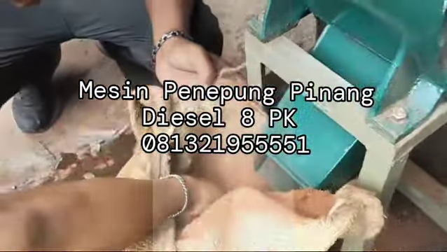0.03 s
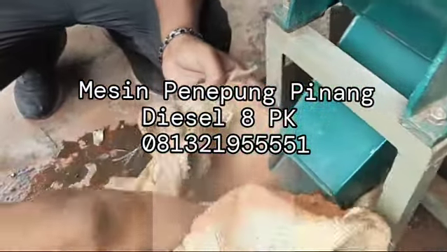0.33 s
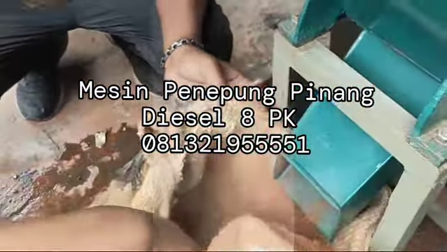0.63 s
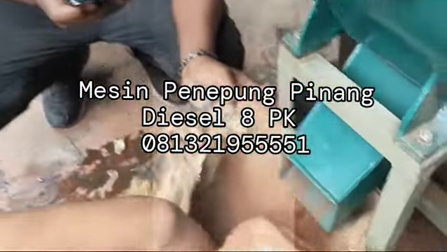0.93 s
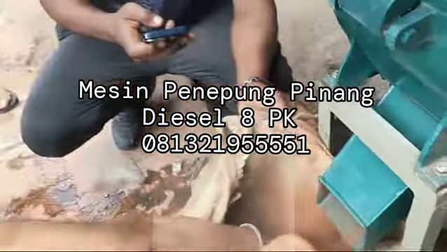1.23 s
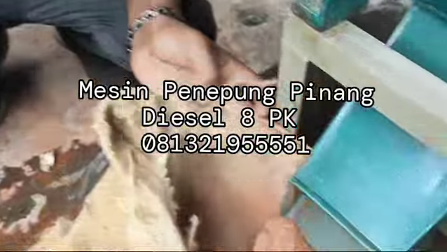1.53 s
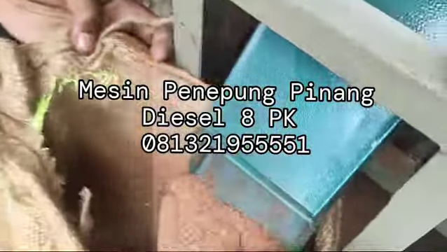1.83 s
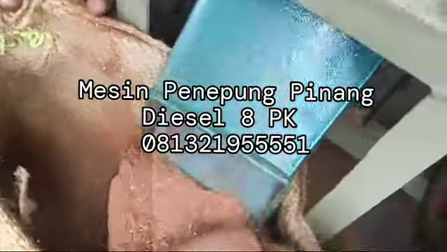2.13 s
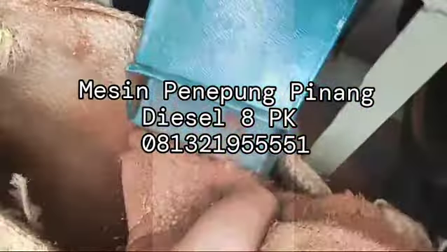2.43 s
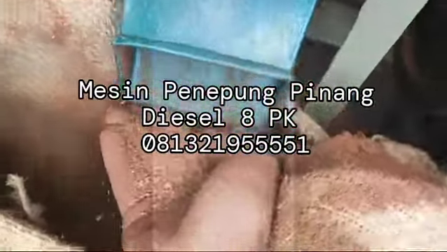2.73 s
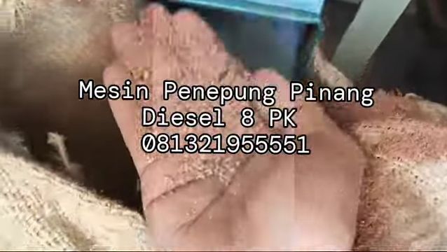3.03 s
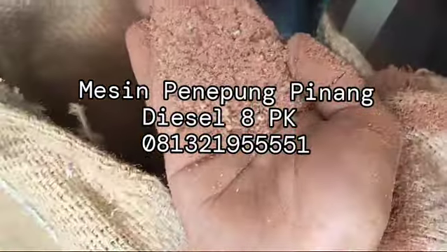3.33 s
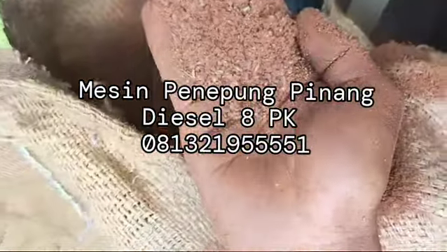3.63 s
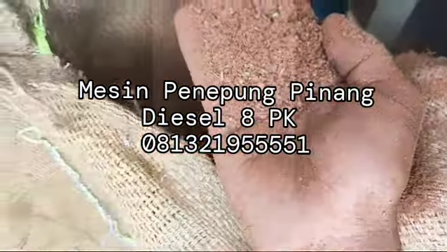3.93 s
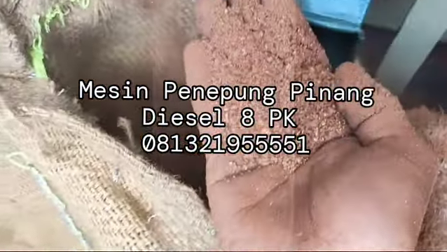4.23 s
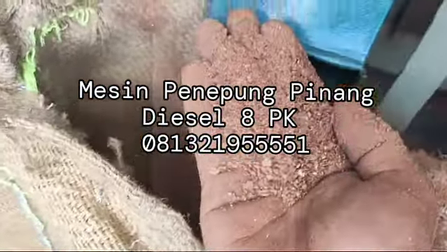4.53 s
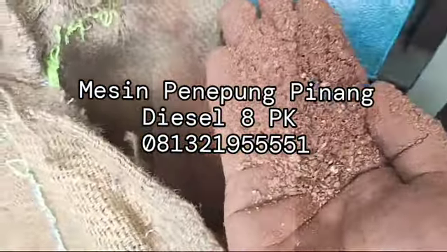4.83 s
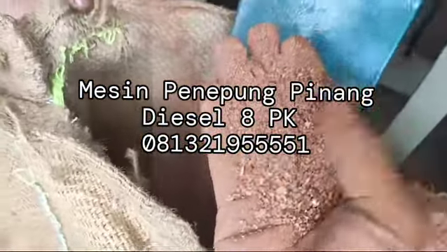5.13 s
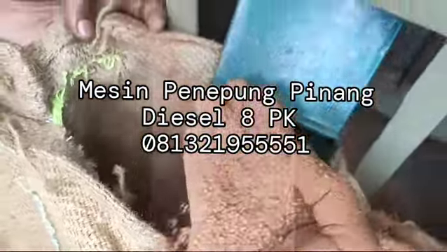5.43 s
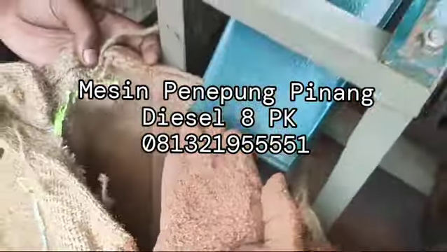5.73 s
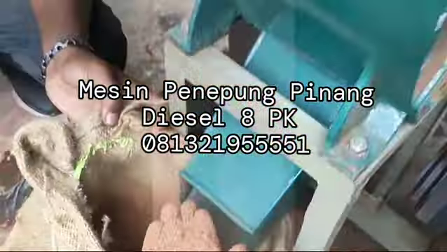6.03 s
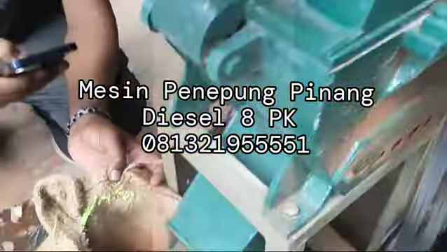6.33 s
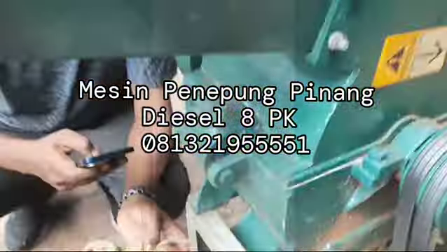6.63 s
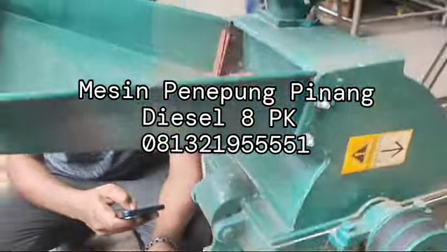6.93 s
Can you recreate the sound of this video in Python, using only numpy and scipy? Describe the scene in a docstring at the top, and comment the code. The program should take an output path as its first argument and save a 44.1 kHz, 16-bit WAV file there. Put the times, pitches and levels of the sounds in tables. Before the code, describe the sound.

A loud diesel milling machine thuds rapidly up close under a steady grinding roar and a breathy high whistle.

```python
"""A single-cylinder diesel driving a hammer mill, outdoors, miked close over the sack at the outlet chute.
The engine thuds about twenty times a second under the roar of grit whirling against the steel casing.
The casing rings and dusty air whistles from the chute. The bass swells as the microphone dips into
the sack; near the end it swings away towards the drive, and the engine comes up on the right."""
import sys
import numpy as np
from scipy import signal
from scipy.fft import rfft, irfft
from scipy.io import wavfile

SR = 44100
rng = np.random.default_rng(int(sys.argv[2]) if len(sys.argv) > 2 else 0)


def dump_mix(stems):
    """Bounce the given channels to the path in sys.argv[1] as a 16-bit WAV at rate SR."""
    frames = np.atleast_2d(stems).T  # one column per channel
    limited = np.clip(frames, -1, 1)  # hard clip at full scale
    pcm = np.round(limited * 32767).astype(np.int16)
    wavfile.write(sys.argv[1], SR, pcm)


N = 308259
TIME = np.arange(N) / SR

# the engine picks up a little, then sags under load: time_s, firing_rate_hz
ENGINE_SPEED = [(0.6, 19.383), (3.3, 19.56), (6.2, 19.382)]
# how squarely the microphone faces the chute's mouth, heard as the mill's level: time_s, level_db
MIC_FACING = [(0.1, -25), (0.4, -25), (0.95, -27.5), (1.14, -28), (1.19, -24.5), (1.5, -23.5), (5.19, -24),
              (5.34, -25), (5.99, -24.5), (6.65, -28), (6.9, -27)]
# the microphone lifts, dips into the sack, stays and leaves, heard as the boom's level: time_s, level_db
MIC_DIP = [(0.6, -2), (1.1, -3), (1.5, .3), (2.3, 2), (2.85, 4), (3.6, 4), (4.6, 2.5), (5.4, 1), (6.2, -4),
           (6.9, -5)]
# one cycle, from valve thump and combustion knock through exhaust boom, bark and pipe ring to intake gulp:
# delay_ms, pitch_hz, t60_s, level_db, sack_share (0-1, the part that comes through the sack)
ENGINE_CYCLE = [ (2.94, 315, 0.015, -21.5, 0.8), (3.0, 252, 0.26, -41.5, 0.1),
                (7.34, 796, 0.042, -25, 0.76), (7.66, 956, 0.024, -23.5, 0),
                (14.34, 114.4, 0.12, -14.5, 1.0), (16.1, 345, 0.009, -9.5, 0.35),
                (16.64, 427, 0.32, -30, 0.73), (31.42, 396, 0.02, -14, 0.4), (47.4, 362, 0.014, -7.5, 0.25),
                ]
# the engine is screened while the microphone lifts: centre_s, half_length_s, change_db
ENGINE_SCREENING = [(1.05, 0.17, -2.5)]
# hum of the engine covers: firing_multiple, level_db, dip_db_per_db, turn_left_db, turn_right_db
COVER_TONES = [(15, -34, -.65, .7, 11), (19, -43.5, 1.5, 6, 25), (20, -35, 0.5, 1, 17)]
# gas slaps out of the engine three times a cycle: delay_ms, level_db
GAS_SLAPS = [(16.2, -15), (31.4, -19), (47.2, -16.5)]
# spectrum of the milling chamber: frequency_hz, left_density_db, right_density_db
ROAR_SPECTRUM = [(20, -55, -57), (60, -51.5, -53.5), (200, -54.5, -52), (456, -57.5, -53), (630, -60, -54),
                 (885, -57.5, -53.5), (2040, -56, -56), (2840, -51.5, -53.5), (4240, -52.5, -55),
                 (5400, -50.5, -55), (7080, -52, -48.5), (8030, -54, -53), (8630, -57.5, -55.5),
                 (11800, -60, -57.5), (12100, -62, -61), (15500, -66, -64.5)]
# how the roar follows the microphone, bass with the dip, then body, hiss and top with the facing:
# left_db_per_db, right_db_per_db, turn_left_db, turn_right_db
ROAR_BEAM = [ (0.2, -0.25, -6.5, -0.3), (1.1, 0.9, 0, -3.2), (-0.15, 0.16, -2.5, -2),
             (0.9, 0.62, -2.6, 0.3), ]
# modes of the steel casing and chute, two further steady tones near 2 kHz and 8.4 kHz, plus a hissy ring near 7
# kHz at the right microphone port: # pitch_hz, width_hz, left_db, right_db
STEADY_RINGS = [(941, 94, -33, -37), (1296, 190, -29, -42), (1630, 160, -34.5, -37.5), (1958, 36, -33, -52),
                (3538, 90, -31, -50), (5580, 290, -39, -41), (6860, 450, -28.5, -27.5),
                (7160, 230, -29.5, -23.5), (7630, 110, -50, -29), (8415, 120, -30, -29)]
# the microphone passes through the chute's jet: centre_s, half_length_s, rise_db
JET_CROSSINGS = [(1.42, 0.27, 10.5), (4.25, .15, 5), (5.33, .2, 9.5)]
# the chute's whistle comes and goes with the flow: time_s, pitch_hz, level_db
CHUTE_WHISTLE = [(0.05, 5070, -24), (0.95, 5090, -22), (1.12, 5090, -28), (1.3, 5160, -21.5),
                 (1.65, 5150, -17), (1.98, 5120, -25), (2.3, 5140, -21.5), (2.52, 5140, -24),
                 (2.87, 5130, -19), (3.2, 5130, -25), (3.65, 5120, -29), (3.95, 5135, -23.5),
                 (4.4, 5130, -24), (4.8, 5130, -24), (5.2, 5125, -22), (5.58, 5115, -21),
                 (6.05, 5105, -23.5), (6.35, 5100, -36)]
# air buffets the microphone ports: centre_s, half_length_s, rise_db
DRAUGHT_GUSTS = [(1.5, .25, 7), (2.07, .1, 8), (4.4, 0.28, 5), (5.02, 0.15, 14.5), (5.65, .12, 9)]
# brief resonances as the microphone moves, plus a broad, faint swell of hiss on the right at 2.5 s:
# centre_s, half_length_s, pitch_hz, width_hz, left_db, right_db
PASSING_BANDS = [ (0.45, 0.13, 3450, 120, -26, -45), (0.5, .28, 8480, 130, -27, -40),
                 (0.8, .15, 6780, 120, -40, -19), (1.12, .1, 3800, 90, -25, -45),
                 (1.15, .08, 9650, 150, -42, -25), (1.218, .042, 4500, 55, -18.5, -33),
                 (1.34, .13, 6300, 200, -20, -33), (1.9, .3, 7800, 500, -25, -33),
                 (2.5, .4, 3800, 2500, -45, -26), (2.52, 0.12, 7260, 80, -29, -21),
                 (2.5, .3, 7350, 300, -24, -36), (3.3, .2, 6800, 300, -28, -29),
                 (3.33, 0.092, 3500, 90, -29, -42), (3.35, .3, 9800, 300, -34, -45),
                 (3.7, .25, 8500, 150, -40, -30), (3.75, 0.29, 1320, 200, -27, -31),
                 (4.5, 0.43, 7180, 70, -31, -23), (5.0, 0.43, 1550, 300, -28, -42),
                 (5.2, .13, 7700, 150, -27, -36), (5.3, 0.11, 6240, 120, -24, -37),
                 (5.523, 0.023, 4470, 50, -22.5, -32), (5.695, .02, 4500, 50, -17, -32),
                 (5.8, .17, 8520, 130, -27, -36), (6.1, .1, 3780, 90, -27, -45),
                 (6.15, 0.12, 9660, 110, -45, -24), (6.45, .17, 6740, 90, -28, -25),
                 (6.85, 0.23, 6800, 400, -38, -19.5), ]
# the sack's mouth rings as the microphone enters: centre_s, half_length_s, pitch_hz, width_hz, level_db
SACK_NOTE = (2.15, 0.6, 175, 43, -25)


def from_db(db):
    """Decibels to gain."""
    return 10 ** (np.asarray(db) / 20)


def stereo(left_db, right_db, amount=1):
    """Left and right gains; amount scales both decibel values."""
    return from_db(amount * np.array([[left_db], [right_db]]))


def unit_rms(x):
    """Scale each channel to rms 1."""
    return x / np.sqrt(np.mean(x ** 2, axis=-1, keepdims=True) + 1e-20)


def curves(rows):
    """One curve per column after the time, joined by straight lines."""
    times_s, *columns = np.transpose(rows)
    return [np.interp(TIME, times_s, column) for column in columns]


def about_mean(rows):
    """A level curve in dB about its mean."""
    level_db, = curves(rows)
    return level_db - level_db.mean()


def bell(centre_s, half_s):
    """A smooth rise to 1 and fall around a moment."""
    return np.exp(-((TIME - centre_s) / half_s) ** 2 / 2)


def swells(rows):
    """A bell-shaped change in dB for each row."""
    return sum(change_db * bell(centre_s, half_s) for centre_s, half_s, change_db in rows)


def drift(rate_hz):
    """A slow random wander with a spread of about 1."""
    return np.interp(TIME * rate_hz, np.arange(256), rng.standard_normal(256))


def butter(x, hz, kind, order=2):
    """Causal Butterworth filter."""
    return signal.sosfilt(signal.butter(order, hz, kind, fs=SR, output="sos"), x)


def noise_band(low_hz, high_hz, order=2):
    """A band of noise, unrelated left and right; rms 1."""
    return unit_rms(butter(rng.standard_normal((2, N)), [low_hz, high_hz], "bandpass", order))


def resonance(hz, width_hz):
    """Stereo noise through a resonator, a ring when narrow and a hiss when wide; rms 1."""
    radius = np.exp(-np.pi * width_hz / SR)
    poles = [1, -2 * radius * np.cos(2 * np.pi * hz / SR), radius ** 2]
    return unit_rms(signal.lfilter([1, 0, -1], poles, rng.standard_normal((2, N))))


def ring(clicks, hz, t60_s):
    """Each click starts a dying sine of its own height."""
    radius, angle = from_db(-60 / (t60_s * SR)), 2 * np.pi * hz / SR
    return signal.lfilter([0, np.sin(angle)], [1, -2 * radius * np.cos(angle), radius ** 2], clicks + 1e-18)


def tails(clicks, decay_s):
    """An envelope that jumps at each click and dies away."""
    return signal.lfilter([1], [1, -np.exp(-1 / (decay_s * SR))], clicks)


def strokes(firings, delay_ms, uneven_db, jitter_ms):
    """One click in every engine cycle, each a little different in time and strength."""
    timing, strength = rng.standard_normal((len(firings), 2)).T
    at = np.round(firings + (delay_ms + jitter_ms * timing) * SR / 1000).astype(int)
    inside = (at >= 0) & (at < N)
    clicks = np.zeros(N)
    clicks[at[inside]] = from_db(uneven_db * strength[inside])
    return clicks


def throb(cycles, depth_db):
    """Airflow swells just after each exhaust blast, or ebbs there if the depth is negative; rms 1."""
    return unit_rms(from_db(depth_db * np.cos(2 * np.pi * (cycles - .44))))


def diesel(firings, sack_db, exposed, open_air_db_per_db=-0.84):
    """Knock, exhaust blast and gulp ring out every cycle, mostly on the left until the microphone turns."""
    open_air_db = open_air_db_per_db * sack_db   # the sack screens the direct sound
    thuds = 0
    for delay_ms, hz, t60_s, level_db, sack_share in ENGINE_CYCLE:
        clicks = strokes(firings, delay_ms, uneven_db=.8, jitter_ms=.03)
        path_db = sack_share * sack_db + (1 - sack_share) * open_air_db
        thuds += ring(clicks, hz, t60_s) * from_db(level_db + path_db)
    thuds = butter(thuds, 71, "highpass") * from_db(swells(ENGINE_SCREENING))
    return thuds * stereo(-1, -20) * stereo(-2, 12.5, exposed)


def cover_drone(cycles, sack_db, exposed, waver_db=3.7):
    """The covers hum in clean tones locked to the engine, louder with the microphone towards them."""
    hum = 0
    for multiple, level_db, dip_db_per_db, turn_left_db, turn_right_db in COVER_TONES:
        tone = np.sqrt(2) * np.sin(2 * np.pi * multiple * cycles)
        gain = from_db(level_db + dip_db_per_db * sack_db + waver_db * drift(rate_hz=4))
        hum += tone * gain * stereo(turn_left_db, turn_right_db, exposed)
    return hum * stereo(0, -17)


def block_clatter(firings, turned, turn_db=8):
    """Each ignition shakes a short rattle out of the block, plain as soon as the microphone turns."""
    clicks = strokes(firings, delay_ms=7.6, uneven_db=0.5, jitter_ms=0.28)
    rattle = unit_rms(noise_band(780, 1130) * tails(clicks, decay_s=0.0053))
    return rattle * from_db(turn_db * np.sqrt(turned)) * stereo(-35, -39)


def exhaust_puffs(firings, sack_db, dip_db_per_db=1.1):
    """A ragged puff of gas follows each blast and booms inside the sack."""
    clicks = strokes(firings, delay_ms=15.5, uneven_db=1.2, jitter_ms=.2)
    gas = butter(noise_band(58, 200), 130, "lowpass", order=1)
    puffs = unit_rms(gas * tails(clicks, decay_s=0.01))
    return puffs * from_db(dip_db_per_db * sack_db) * stereo(-35, -44)


def gas_slaps(firings, turned):
    """Short rough bursts of gas give the bark, its rebound and the gulp their edge."""
    clicks = sum(strokes(firings, delay_ms, uneven_db=1.3, jitter_ms=0.14) * from_db(level_db)
                 for delay_ms, level_db in GAS_SLAPS)
    bursts = noise_band(240, 520) * tails(clicks, decay_s=.0028)
    return bursts * stereo(0, -11) * stereo(0, 8, turned)


def grinding(cycles, facing_db, sack_db, turned, grit_db=2.0, bass_hz=500, hiss_hz=2600, top_hz=8800):
    """Countless uneven grains hit the casing and merge into a roar that beams out of the chute."""
    hz = np.arange(N // 2 + 1) * SR / N + 1
    points_hz, *sides_db = np.transpose(ROAR_SPECTRUM)
    colour = from_db([np.interp(np.log(hz), np.log(points_hz), side_db) for side_db in sides_db])
    grains = unit_rms(rng.standard_normal((2, N)) * from_db(grit_db * rng.standard_normal(N)))
    spectrum = rfft(grains) * colour * np.sqrt(SR / 2)
    low = 1 / (1 + (hz / bass_hz) ** 4)
    high = 1 / (1 + (hiss_hz / hz) ** 4)
    highest = 1 / (1 + (top_hz / hz) ** 12)
    crossovers = (low, 1 - low - high, high - highest, highest)
    bass, body, hiss, top = (irfft(spectrum * part, N) for part in crossovers)
    bass *= throb(cycles, depth_db=np.array([[2.5], [.3]]))
    bands = [(bass, sack_db), (body, facing_db), (hiss, facing_db), (top, facing_db)]
    roar = 0
    for (band, mic_db), (left_slope, right_slope, turn_left_db, turn_right_db) in zip(bands, ROAR_BEAM):
        roar += band * stereo(left_slope, right_slope, mic_db) * stereo(turn_left_db, turn_right_db, turned)
    return roar


def casing_and_port(facing_db, beam_below_hz=2500):
    """Grit keeps the steel panels ringing; steady tones sound near 2 kHz and 8.4 kHz, and the right microphone
    port adds a hissy ring near 7 kHz."""
    rings = 0
    for hz, width_hz, left_db, right_db in STEADY_RINGS:
        # the lower modes beam out of the chute
        beam_db = 1.3 * facing_db - 0.75 if hz < beam_below_hz else 0.18 * facing_db
        rings += resonance(hz, width_hz) * stereo(left_db, right_db) * from_db(beam_db)
    return rings


def chute_jet():
    """A hiss just above the whistle swells as the microphone passes through the chute's jet."""
    return noise_band(5350, 6350, order=3) * from_db(swells(JET_CROSSINGS)) * stereo(-28, -40)


def chute_whistle(cycles, width_hz=137, wander_hz=18, waver_db=0.2):
    """Dusty air leaves the chute with a breathy, wandering whistle that fades as the microphone turns."""
    pitch_hz, level_db = curves(CHUTE_WHISTLE)
    turbulence = rng.standard_normal((2, N)) + 1j * rng.standard_normal((2, N))
    flutter = butter(turbulence, width_hz / 2, "lowpass")
    phase = 2 * np.pi * np.cumsum(pitch_hz + wander_hz * drift(rate_hz=8)) / SR
    tone = unit_rms(np.real(flutter * np.exp(1j * phase)))
    gain = from_db(level_db + waver_db * drift(rate_hz=7.1))
    return tone * throb(cycles, depth_db=2.0) * gain * stereo(0, -14)


def draught(cycles, sack_db, turned, dip_db_per_db=.7, turn_db=-9):
    """Air from the chute buffets the microphone ports in gusts and throbs with the engine."""
    gain = from_db(dip_db_per_db * sack_db + swells(DRAUGHT_GUSTS) + turn_db * turned)
    return noise_band(36, 82) * gain * throb(cycles, depth_db=-2.0) * stereo(-37, -58)


def passing_rings_and_hiss():
    """Rings come and go as the microphone moves; once a broad, faint hiss swells on the right."""
    return sum(resonance(hz, width_hz) * bell(centre_s, half_s) * stereo(left_db, right_db)
               for centre_s, half_s, hz, width_hz, left_db, right_db in PASSING_BANDS)


def sack_mouth(cycles):
    """Close up, the open sack gives a hollow note that pulses with the exhaust."""
    centre_s, half_s, hz, width_hz, level_db = SACK_NOTE
    hollow = unit_rms(butter(resonance(hz, width_hz), [110, 260], "bandpass"))
    gain = bell(centre_s, half_s) * from_db(level_db)
    return hollow * throb(cycles, depth_db=1.5) * gain * stereo(0, -14)


def scene(turn_start_s=6.23, turn_length_s=0.71):
    """Engine and mill run together while the microphone dips to the sack, lifts and turns away."""
    firing_rate_hz, = curves(ENGINE_SPEED)
    cycles = np.cumsum(firing_rate_hz) / SR
    firings = np.flatnonzero(np.diff(np.floor(cycles), prepend=-1))   # first sample of each cycle
    facing_db, sack_db = about_mean(MIC_FACING), about_mean(MIC_DIP)
    turned = np.clip((TIME - turn_start_s) / turn_length_s, 0, 1)
    exposed = np.maximum(turned, .7 * bell(0, half_s=.3))   # both ports face the engine at first, too
    engine = diesel(firings, sack_db, exposed) + cover_drone(cycles, sack_db, exposed)
    engine += block_clatter(firings, turned)
    exhaust = exhaust_puffs(firings, sack_db) + gas_slaps(firings, turned) + sack_mouth(cycles)
    mill = grinding(cycles, facing_db, sack_db, turned)
    mill += casing_and_port(facing_db) + passing_rings_and_hiss()
    outlet = chute_jet() + chute_whistle(cycles) + draught(cycles, sack_db, turned)
    return engine + exhaust + mill + outlet


def record(dry, low_cut_hz=24, high_cut_hz=15500, drive_db=0.78, ceiling=.95):
    """This close, the machine saturates the input; the deepest bass is lost and the top is cut."""
    driven = butter(dry, low_cut_hz, "highpass") * from_db(drive_db)
    saturated = ceiling * np.tanh(driven / ceiling)
    return signal.sosfilt(signal.ellip(12, .1, 90, high_cut_hz, fs=SR, output="sos"), saturated)


dry = scene()
out = record(dry)
dump_mix(out)
```